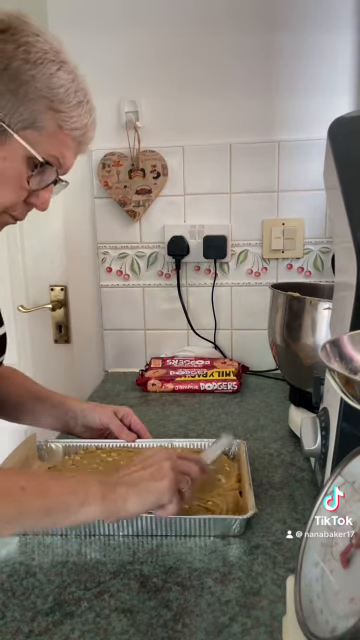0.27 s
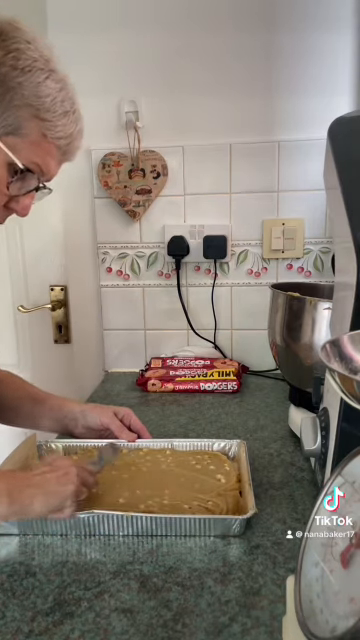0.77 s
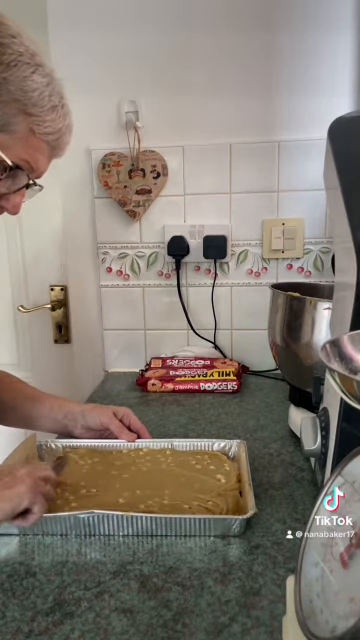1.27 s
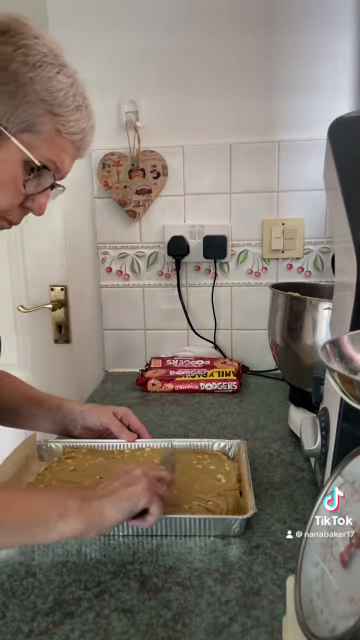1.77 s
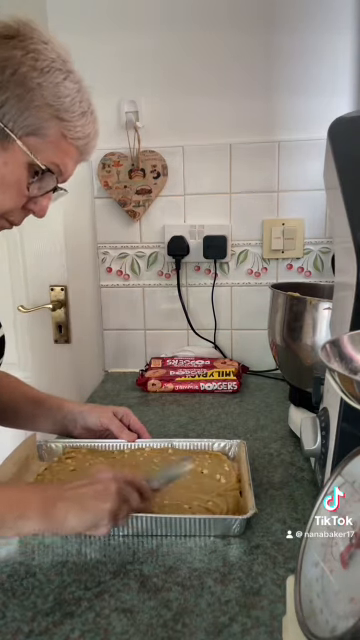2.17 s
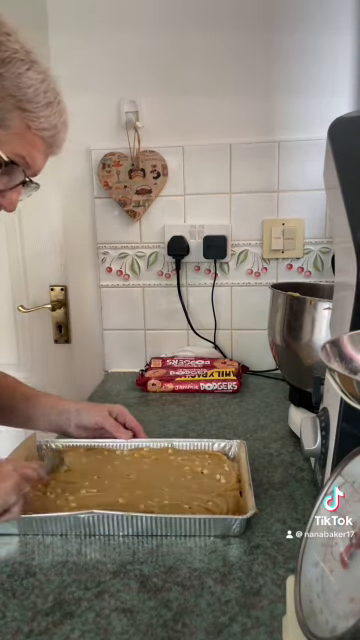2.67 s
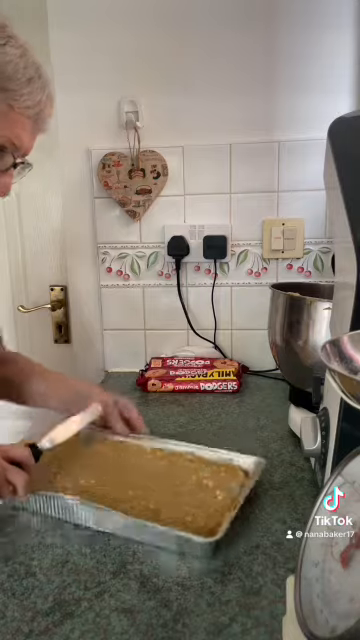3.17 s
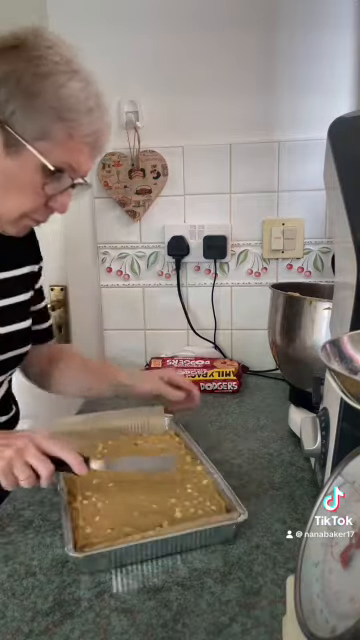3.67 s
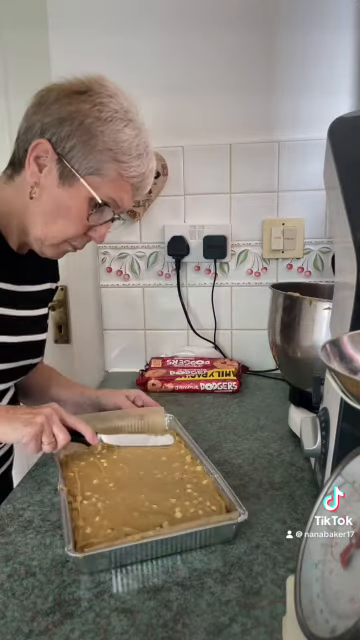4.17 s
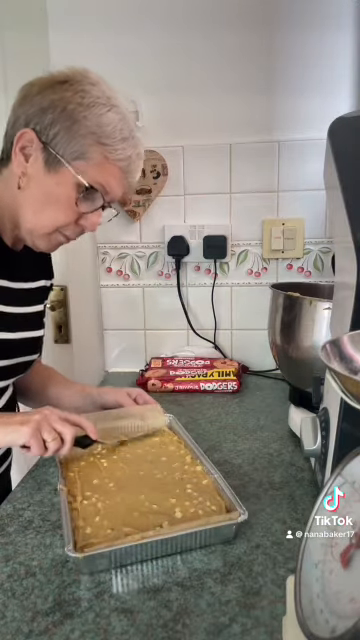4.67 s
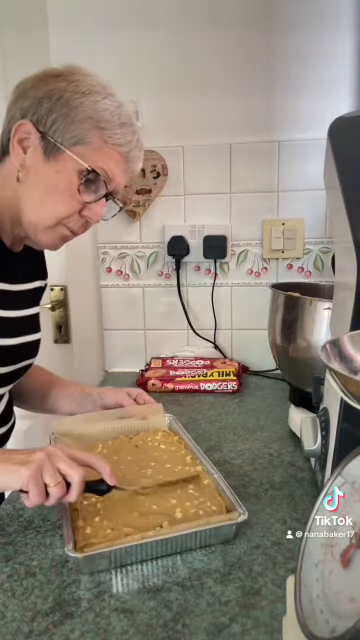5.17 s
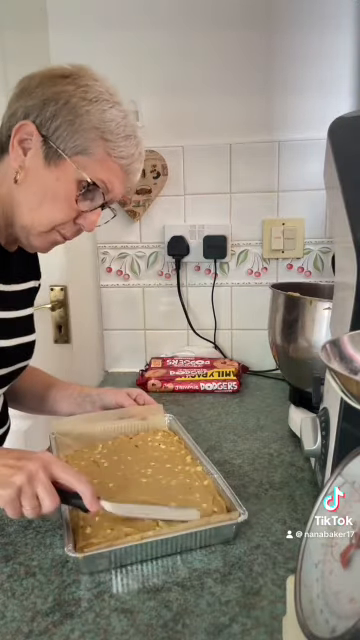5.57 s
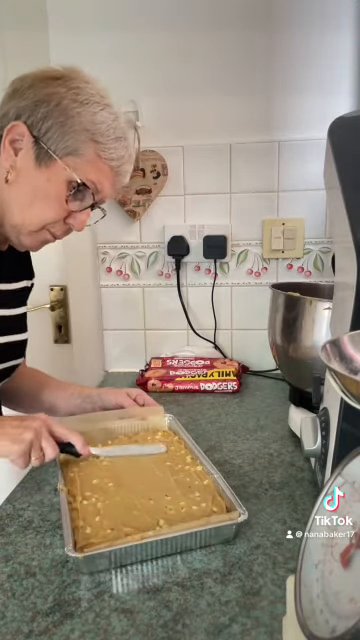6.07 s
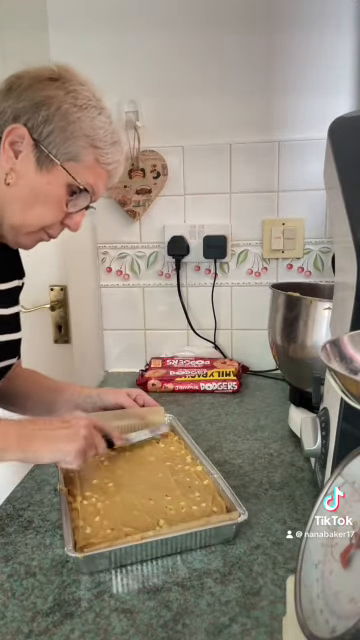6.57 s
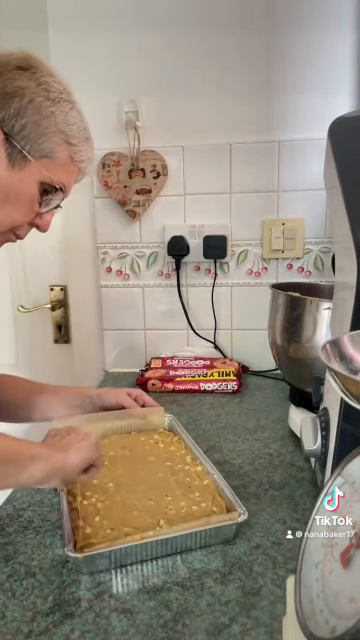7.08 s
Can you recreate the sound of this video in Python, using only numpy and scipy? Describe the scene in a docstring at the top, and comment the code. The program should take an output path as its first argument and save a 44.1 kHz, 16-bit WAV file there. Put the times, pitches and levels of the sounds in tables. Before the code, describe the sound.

In a small kitchen, a blade drags and taps in a foil baking tray, which crackles, then skates brightly round on the worktop before spreading resumes.

```python
"""A flat knife spreads thick batter in a foil baking tray on a kitchen worktop.
Throughout, sines and filtered noise give an appliance hum, room air and hiss. From the start the blade drags
by stick and slip, the foil buckles in snaps and batter ticks; soon modal knocks and worktop thuds join,
then chafes at single resonances and, later, clicks on the rim. A little before midway the tray is slid
round with bright grit, and the spreading resumes. Echoes and a brief diffuse tail surround the contacts."""
import sys
import numpy as np
from scipy import signal
from scipy.fft import rfft, irfft, next_fast_len
from scipy.io import wavfile
from scipy.ndimage import uniform_filter1d

SR = 44100
rng = np.random.default_rng(int(sys.argv[2]) if len(sys.argv) > 2 else 0)


def dump_mix(stems):
    """Bounce the given channels to the path in sys.argv[1] as a 16-bit WAV at rate SR."""
    frames = np.atleast_2d(stems).T  # one column per channel
    limited = np.clip(frames, -1, 1)  # hard clip at full scale
    pcm = np.round(limited * 32767).astype(np.int16)
    wavfile.write(sys.argv[1], SR, pcm)


N = 323782

# Registers of a contact: hollow tray floor, rasp of its walls, fizz of the foil: (low edge [Hz], high edge [Hz])
REGISTERS_HZ = [(350, 1700), (1700, 5000), (5000, 17000)]
REGISTER_FILTERS = [
    signal.butter(3 if low < 1000 else 4, [low, high], "band", fs=SR, output="sos")
    for low, high in REGISTERS_HZ
]

# Steady appliance hum: (frequency [Hz], rms level [dB])
HUM = [(100.2, -60), (113.0, -72.5), (141.3, -66.5), (156.8, -79.5), (171.4, -76.5), (298, -82.5),
       (353, -87)]
# Relative spectrum of the room air: (frequency [Hz], level [dB])
AIR_COLOUR = [(20, -16.5), (40, 0), (60, 7), (120, 9), (200, 1.5), (320, -1), (500, -4), (1000, -11.5),
              (2200, -12.5), (2700, -13.5), (3400, -15.5), (5700, -18), (16000, -22.5)]
# Relative spectrum of the fine hiss: (frequency [Hz], level [dB])
HISS_COLOUR = [(3000, -34.5), (6000, -12), (8700, -5), (9800, -5), (10200, -2.5), (10700, -9), (11800, -8),
               (13700, 2.5), (15700, -0.5)]
AIR_DB, HISS_DB = -68, -67.5  # rms before the top is cut

# Spreading strokes: (time of full speed [s], whole length [s], rasp level [dB], fizz level [dB])
STROKES = [(0.09, 0.32, -81.5, -68), (0.63, 0.15, -83, -67), (0.7, 0.19, -58, -60),
           (0.785, 0.081, -70, -62), (0.93, 0.67, -76.5, -67.5), (1.45, .12, -78.5, -68),
           (1.78, 0.35, -87, -71.5), (2.125, 0.087, -72, -70), (2.29, 0.18, -81, -66),
           (2.445, 0.12, -71.5, -64.5), (2.765, 0.23, -62, -58.5), (2.865, 0.085, -63, -59),
           (2.935, .11, -61, -54), (3.795, 0.13, -70, -59.5), (3.99, 0.5, -80, -71.5),
           (4.05, 0.061, -67, -57.5), (4.135, 0.031, -76, -69), (4.53, 0.056, -55, -51),
           (4.585, 0.23, -66.5, -66), (4.735, .1, -58.5, -55.5), (5.615, 0.11, -67, -75),
           (5.71, 0.42, -77, -77), (5.76, .04, -81, -64), (6.475, 0.098, -72.5, -65),
           (6.575, 0.2, -65, -58), (6.8, .075, -48, -48), (6.82, 0.31, -70, -64.5), (7.1, 0.15, -65, -61),
           (7.185, 0.12, -62, -57), (7.28, 0.14, -63.5, -57.5)]
# Relative spectrum of the dragging blade: (frequency [Hz], level [dB])
STROKE_COLOUR = [(300, 1.5), (550, -5.5), (820, 4), (1150, -3.5), (1900, -3), (2800, -3.5), (3600, -6),
                 (5300, -8.5), (6800, -1.5), (8800, 3), (11200, -8), (13200, 1.5), (14400, 7), (15800, -6)]
STROKE_FOLLOWS = 0.83  # friction grows as this power of the blade's speed

# The foil buckles with a bright snap: (time [s], rasp level [dB], fizz level [dB])
SNAPS = [(0.016, -88, -66), (0.094, -88, -64), (0.621, -80, -60.5), (0.996, -90, -57.5), (1.221, -91, -71),
         (1.041, -49.5, -41), (1.307, -54, -46), (1.682, -75, -61), (2.634, -50.5, -43.5),
         (2.738, -60.5, -55), (2.816, -63, -67), (2.833, -57.5, -59), (2.909, -81, -48.5),
         (4.503, -63, -63), (4.702, -59.5, -55), (4.748, -63, -57), (4.762, -55, -41.5), (4.947, -88, -68),
         (5.146, -97, -72), (5.57, -78, -69), (6.519, -61.5, -57.5), (6.755, -57, -52.5)]
# Relative spectrum of snapping foil: (frequency [Hz], level [dB])
SNAP_COLOUR = [(450, -21), (820, -21.5), (1200, -25.5), (2000, -18), (3200, -10.5), (4500, -15.5),
               (5700, -6.5), (6900, -5.5), (8700, 3.5), (11000, -3), (12500, 0.5), (14000, 8.5), (15600, 0)]

# Blade knocks on the tray floor: (time [s], hollow level [dB], rasp level [dB], fizz level [dB])
KNOCKS = [(0.386, -47, -46, -49), (0.395, -46, -57, -44), (0.416, -43, -41, -33), (2.317, -77, -76, -57),
          (2.322, -64, -59, -64), (2.884, -52, -51, -60), (3.752, -70.5, -77, -76), (3.866, -59, -71, -76),
          (4.518, -74, -61, -62), (4.566, -62, -62, -70), (4.613, -71, -71, -63), (4.763, -60, -62, -62),
          (4.912, -76, -75, -83), (5.008, -72.5, -74.5, -89), (5.358, -87, -70.5, -70),
          (5.62, -70, -67, -79), (6.795, -81, -64, -60), (7.077, -65, -66, -72), (7.178, -59, -68, -64)]
# Resonances of blade and tray together: (frequency [Hz], bandwidth [Hz], mean relative level [dB])
KNOCK_MODES = [(753, 69, -2), (1160, 220, -1), (1990, 890, -6.5), (2850, 270, 11.5), (4240, 270, -4),
               (5440, 1900, -12), (8900, 1470, 6), (12500, 640, 8), (14670, 860, 16)]

# The worktop takes the weight of hand and tray: (time [s], boom level [dB], level of upper modes [dB])
THUDS = [(0.39, -57, -63.5), (0.418, -60, -70), (0.649, -61, -63), (0.706, -54.5, -67), (0.766, -62, -71),
         (2.142, -66.5, -85), (2.317, -57, -62), (2.337, -55.5, -70), (2.882, -62.5, -68), (2.92, -61, -90),
         (3.19, -64, -66.5), (3.387, -58.5, -68.5), (3.75, -63.5, -74), (3.82, -63, -82), (5.68, -76, -68),
         (6.765, -66, -67), (6.809, -64, -65)]
# Worktop modes in three groups, low, middle and upper: (frequency [Hz], bandwidth [Hz], mean relative level [dB])
WORKTOP_MODES = [
    [(59.6, 4.9, 0)],
    [(115.5, 4.6, 9.5), (170.3, 7.8, 5.5), (196, 3.6, -2.5)],
    [(240, 180, 4), (303, 84, 6.5), (389, 35, 0), (500, 7.2, 2.5)],
]
LOW_MODE_DB = -4  # the lowest mode, relative to the boom

# Blade or base catches and chafes: (time of its height [s], half of its length [s], frequency [Hz], level [dB])
CHAFES = [(0.7, 0.078, 2170, -59.5), (0.732, .071, 2720, -72), (0.793, 0.024, 1640, -58.5),
          (0.958, .05, 2080, -71.5), (1.029, 0.035, 2030, -63.5), (2.291, .04, 2650, -68),
          (2.761, .048, 1040, -58), (2.927, 0.048, 3200, -55.5), (3.2, 0.04, 1330, -52.5),
          (3.404, 0.043, 900, -61), (4.52, .025, 1270, -54.5), (4.555, 0.044, 2200, -65),
          (5.68, .13, 2450, -73), (6.735, 0.048, 2630, -64), (6.801, 0.029, 1700, -65),
          (6.865, 0.032, 1640, -64)]

# The blade tip clicks on the stiff rolled rim: (time [s], rasp level [dB], fizz level [dB])
RIM_CLICKS = [(2.18, -67.5, -68.5), (4.363, -68.5, -70), (4.41, -73, -70), (4.646, -51.5, -53.5),
              (4.765, -51.5, -51), (6.048, -74, -66.5)]
# Relative spectrum of the rim: (frequency [Hz], level [dB])
RIM_COLOUR = [(450, -31), (1500, -6.5), (4000, -5), (5500, 0), (7500, 11.5), (9200, 8.5), (10800, -2),
              (14000, -1), (15800, -11)]

# The tray is slid round in one sweep
TURN_AT_S, TURN_LENGTH_S = 3.2385, 0.59  # moment of full speed and whole length
# Levels of the turn at full speed, for hollow, rasp and fizz in turn: (level [dB])
TURN_DB = [-59.5, -49, -38]
# Growth of the same three with speed, so that faster is brighter: (exponent [1])
TURN_FOLLOWS = [1, 1.82, 2.38]
# Relative spectrum of the sliding base: (frequency [Hz], level [dB])
TURN_COLOUR = [(350, -20.5), (800, -6), (1500, -9.5), (2900, 2), (4000, -4), (5300, -10.5), (6700, -5.5),
               (9000, -2), (10400, -7.5), (12000, -8.5), (13300, -1.5), (14200, 2), (15700, -8)]

# The hollow tone of the floor follows the rasp of the wall, but swings less widely in level
MODERATE_WALL_DB = -60
FLOOR_FOLLOWS = 0.76  # dB of floor per dB of wall

KITCHEN_T60_S = 0.26
CUTOFF_HZ = 15900


def from_db(db):
    """Logarithmic level: 20 dB is a tenfold amplitude."""
    return 10 ** (np.asarray(db) / 20)


def rms_one(x):
    """Normalisation of power: the root mean square becomes one."""
    return x / np.sqrt(np.mean(x ** 2) + 1e-20)


def add(track, s, sound):
    """Superposition: a sound is summed into the track from time s."""
    at = round(s * SR)
    track[at:at + len(sound)] += sound[:N - at]


def colour(x, spectrum):
    """Minimum-phase filtering: folding the cepstrum gives a causal filter of the given spectrum."""
    size = next_fast_len(len(x) // 2 + 4096) * 2
    hz, db = np.transpose(spectrum)
    grid = np.maximum(np.fft.rfftfreq(size, 1 / SR), 1)
    gain = from_db(np.interp(np.log(grid), np.log(hz), db))
    cepstrum = irfft(np.log(gain))
    # fold the second half onto the first
    cepstrum[1:size // 2] *= 2
    cepstrum[size // 2 + 1:] = 0
    response = np.exp(rfft(cepstrum))
    return irfft(rfft(x, size) * response)[:len(x)]


def background():
    """Stationary sources: steady motor and mains sines over noise shaped as room air and fine hiss."""
    t = np.arange(N) / SR
    hum = 0
    for hz, db in HUM:
        cycles = hz * t + rng.random()
        hum = hum + np.sqrt(2) * from_db(db) * np.sin(2 * np.pi * cycles)
    air = from_db(AIR_DB) * rms_one(colour(rng.standard_normal(N), AIR_COLOUR))
    hiss = from_db(HISS_DB) * rms_one(colour(rng.standard_normal(N), HISS_COLOUR))
    return hum + air + hiss


def registers(x):
    """Band analysis: a sound is split into hollow, rasp and fizz."""
    return [signal.sosfilt(band, x) for band in REGISTER_FILTERS]


def kitchen(direct_db, early_db, early_t60=0.064):
    """Room response: direct sound, sparse echoes off worktop and tiles, a diffuse tail; levels re the tail."""
    t = np.arange(SR // 4) / SR
    tail = rms_one(rng.standard_normal(len(t)) * from_db(-60 * t / KITCHEN_T60_S))
    is_echo = rng.random(len(t)) < 2500 / SR  # 2500 echoes per second on average
    echoes = rng.standard_normal(len(t)) * is_echo
    response = tail + from_db(early_db) * rms_one(echoes * from_db(-60 * t / early_t60))
    response[0] += from_db(direct_db) * np.sqrt(len(t))
    return response / np.linalg.norm(response)


def travel(x, direct_db, count=5, spots_per_s=16):
    """Moving source: the contact fades from spot to spot, so its pattern of echoes keeps changing."""
    place, out = np.arange(N) / SR * spots_per_s, 0
    for k in range(count):
        away = np.abs((place - k + count / 2) % count - count / 2)  # distance round a ring of spots
        share = np.cos(np.pi / 2 * np.minimum(away, 1))  # crossfade of equal power
        out = out + signal.oaconvolve(x * share, kitchen(direct_db, early_db=4))[:N]
    return out


def drift(rate):
    """Random modulation: straight lines join normal draws of spread 1, rate of them per second."""
    knots = rng.standard_normal(4000)
    return np.interp(np.arange(N) / SR * rate, np.arange(len(knots)), knots)


def rub(gains, spectrum, slips_per_s, spread_db, judder_db, direct_db):
    """Stick and slip: a hail of tiny uneven clicks, bunched by the judder of the hand."""
    unevenness = np.minimum(rng.exponential(1, N), 4)
    sizes = from_db(spread_db * unevenness) * rng.choice([-1, 1], N)
    is_slip = rng.random(N) < slips_per_s / SR
    slips = sizes * is_slip * from_db(judder_db * drift(110))
    # the slips are evened out in power over about 1500 samples, so the rub stays steady
    slips = slips / np.sqrt(uniform_filter1d(slips ** 2, size=1500) + 1e-6)
    parts = registers(colour(slips, spectrum))
    out = sum(gain * rms_one(part) for gain, part in zip(gains, parts))
    return travel(out, direct_db)


def sweep(middle_s, length_s):
    """Kinematics of one hand movement, speed 0-1: it starts from rest, peaks halfway and comes to rest."""
    phase = (np.arange(N) / SR - middle_s) / length_s
    return np.cos(np.pi * np.clip(phase, -0.5, 0.5)) * (np.abs(phase) < 0.5)


def with_floor(rows, floor_db):
    """Coupling of floor to wall: a hollow level precedes rasp and fizz; floor_db is for a moderate wall."""
    out = []
    for *timing, rasp, fizz in rows:
        hollow = floor_db + FLOOR_FOLLOWS * (rasp - MODERATE_WALL_DB)
        out.append((*timing, hollow, rasp, fizz))
    return out


def spreading_strokes():
    """Sliding friction: the drag of each stroke grows with blade speed, and strokes add in power."""
    power = 0
    for s, length, *levels in with_floor(STROKES, floor_db=-66.5):
        friction = sweep(s, length) ** STROKE_FOLLOWS
        power = power + np.outer(from_db(levels), friction) ** 2
    return rub(np.sqrt(power), STROKE_COLOUR, slips_per_s=1400, spread_db=1.0, judder_db=2.0, direct_db=-1.0)


def strike(rows, body, direct_db, early_db):
    """Impulse excitation: a room response rings through a body; levels are set over each first 20 ms."""
    out = np.zeros(N)
    for s, *levels in rows:
        blow = body(kitchen(direct_db, early_db))
        for part, db in zip(registers(blow), levels):
            add(out, s, from_db(db) * part / np.std(part[:SR // 50]))
    return out


def foil_ring(x):
    """Broadband radiation: thin foil colours an impulse with its bright spectrum."""
    return colour(x, SNAP_COLOUR)


def foil_snaps():
    """Buckling: the thin foil jumps from one shape to another with a sharp snap."""
    return strike(with_floor(SNAPS, floor_db=-70.5), foil_ring, direct_db=-10.0, early_db=-4.5)


def batter_ticks(level_db=-73, rasp_below_db=14, count=24):
    """Adhesion: sticky batter parts from the blade with faint ticks at random moments."""
    when = rng.random(count) * (N - 1) / SR
    rows = [(s, level_db - rasp_below_db, level_db) for s in when]
    return strike(with_floor(rows, floor_db=-65), foil_ring, direct_db=-2, early_db=-8)


def resonate(x, modes, scatter_db):
    """Modal superposition: parallel resonances, each level scattered at random by scatter_db on every call."""
    out = 0
    for k, (hz, width, db) in enumerate(modes):
        r = np.exp(-np.pi * width / SR)  # pole radius: a wider resonance decays sooner
        poles = [1, -2 * r * np.cos(2 * np.pi * hz / SR), r * r]
        ringing = signal.lfilter([1, 0, -1], poles, x + 1e-18)
        gain = (1 - r * r) / 2 * from_db(db + scatter_db * rng.standard_normal())
        out = out + (-1) ** k * gain * ringing
    return out


def blade_ring(x):
    """Forced and free vibration: a short broad crack with the modal ring of blade and tray."""
    return resonate(x, KNOCK_MODES, scatter_db=4.0) + from_db(-15.5) * x


def blade_knocks():
    """Impact: the blade strikes the tray floor and both ring in their modes."""
    return strike(KNOCKS, blade_ring, direct_db=-3, early_db=-5)


def worktop_thuds(push_s=0.016, scatter_db=5.5):
    """Transient modal excitation: a brief decaying push booms in the worktop; levels span the first 50 ms."""
    out, t = np.zeros(N), np.arange(SR // 2) / SR
    for s, boom_db, upper_db in THUDS:
        push = rng.standard_normal(len(t)) * np.exp(-t / push_s)
        for modes, db in zip(WORKTOP_MODES, (boom_db + LOW_MODE_DB, boom_db, upper_db)):
            boom = resonate(push, modes, scatter_db)
            add(out, s, from_db(db) * boom / np.std(boom[:SR // 20]))
    return out


def chafes(width_hz=430):
    """Resonant friction: rubbing noise briefly drives one resonance of the tray, at its wall or base."""
    out = np.zeros(N)
    for s, half_length, hz, db in CHAFES:
        swell = np.hanning(round(2 * half_length * SR))
        friction = rms_one(resonate(rng.standard_normal(SR // 2), [(hz, width_hz, 0)], 0))
        add(out, s - half_length, from_db(db) * swell * friction[:len(swell)])
    return travel(out, direct_db=-2)


def rim_ring(x):
    """Spectral shaping: the stiff rolled rim colours an impulse."""
    return colour(x, RIM_COLOUR)


def rim_clicks():
    """Impact on a stiff edge: the blade tip clicks on the rim, in a narrower treble than the snaps."""
    return strike(with_floor(RIM_CLICKS, floor_db=-70.5), rim_ring, direct_db=-7.0, early_db=-3)


def tray_turning():
    """Dense stick and slip: the crinkled base skates over the worktop with grit that brightens with speed."""
    speed = sweep(TURN_AT_S, TURN_LENGTH_S)
    gains = [from_db(db) * speed ** follows for db, follows in zip(TURN_DB, TURN_FOLLOWS)]
    return rub(gains, TURN_COLOUR, slips_per_s=4200, spread_db=1.5, judder_db=-0.6, direct_db=2.5)


def scene():
    """Linear superposition: all sources add at one microphone."""
    blade = spreading_strokes() + blade_knocks() + chafes() + rim_clicks()
    foil_and_batter = foil_snaps() + batter_ticks()
    support = worktop_thuds() + tray_turning()
    return (background() + blade + foil_and_batter + support)[None]


def record(dry):
    """Band limitation: a steep elliptic low-pass cuts the top."""
    low_pass = signal.ellip(10, 0.1, 70, CUTOFF_HZ, fs=SR, output="sos")
    return signal.sosfilt(low_pass, dry)


dry = scene()
out = record(dry)
dump_mix(out)
```